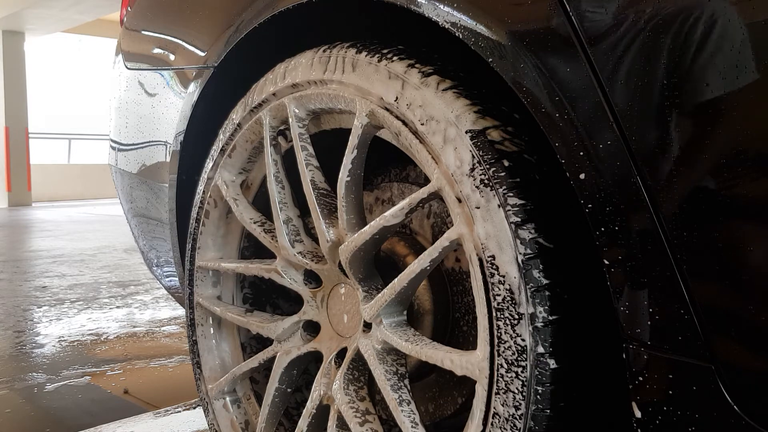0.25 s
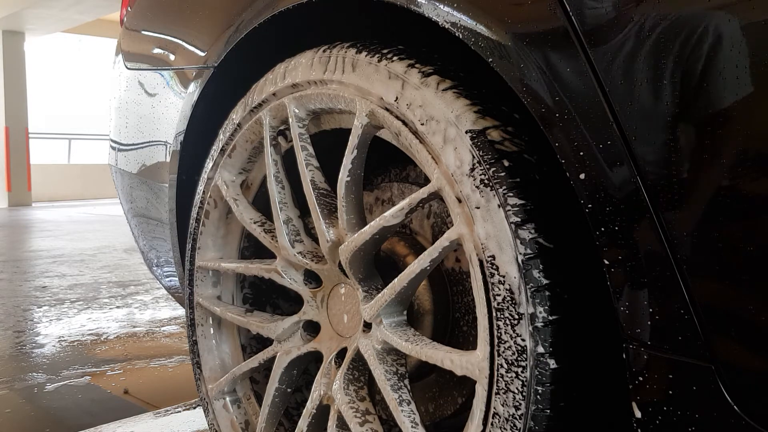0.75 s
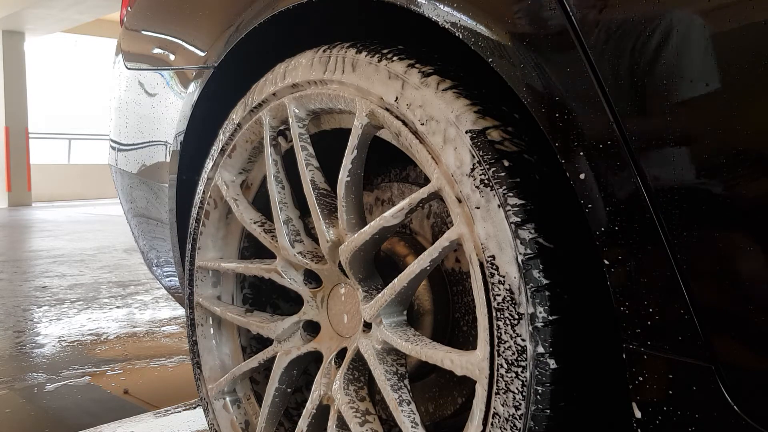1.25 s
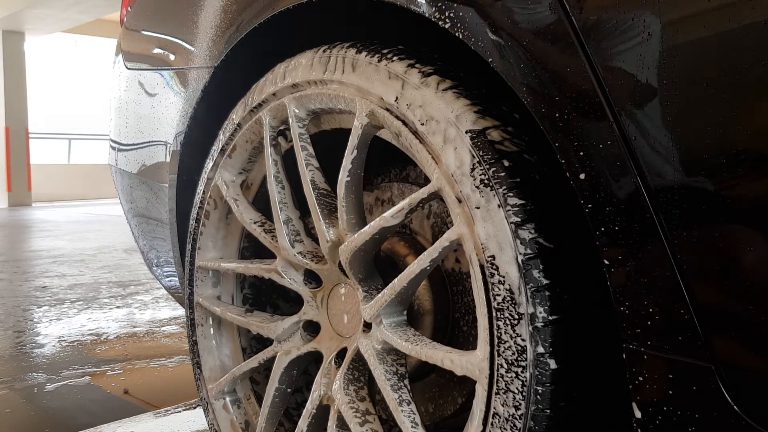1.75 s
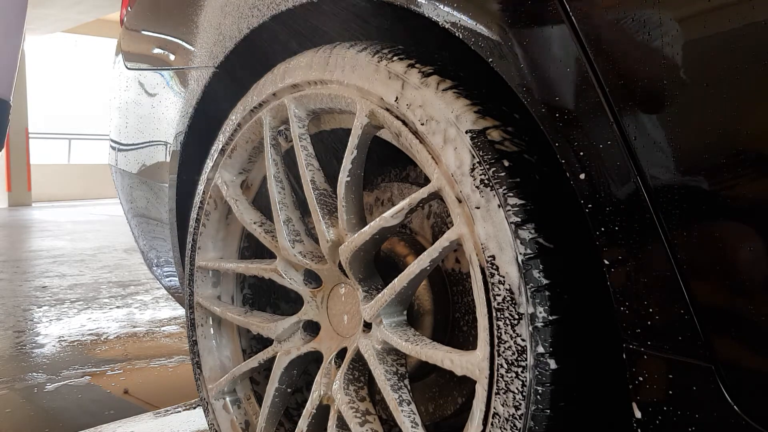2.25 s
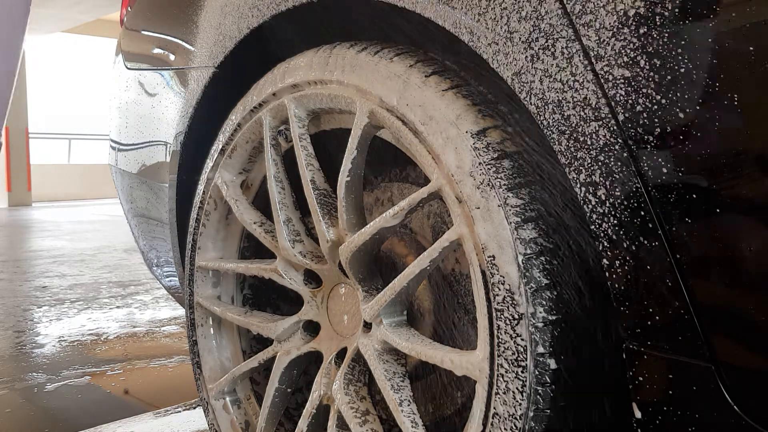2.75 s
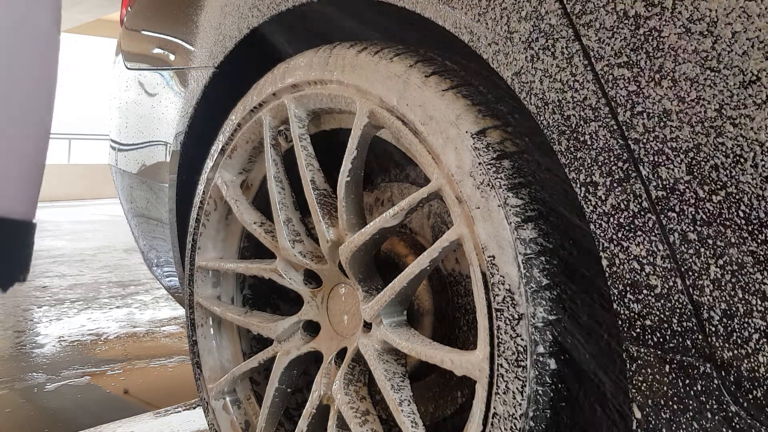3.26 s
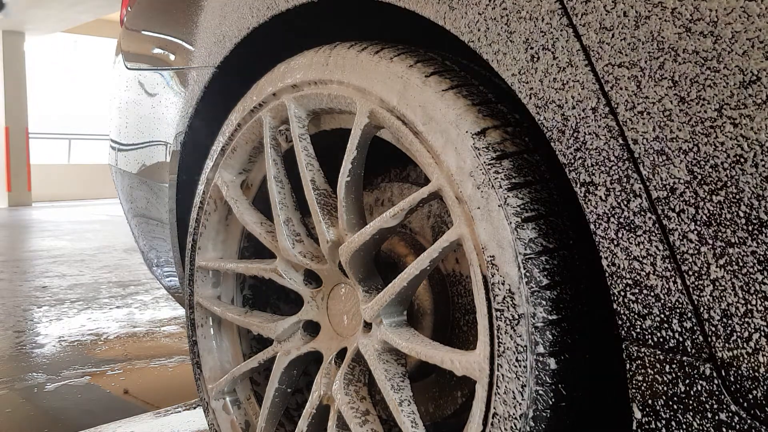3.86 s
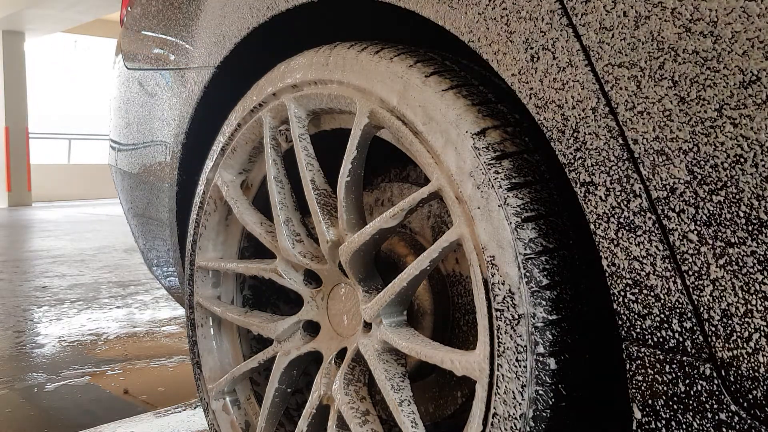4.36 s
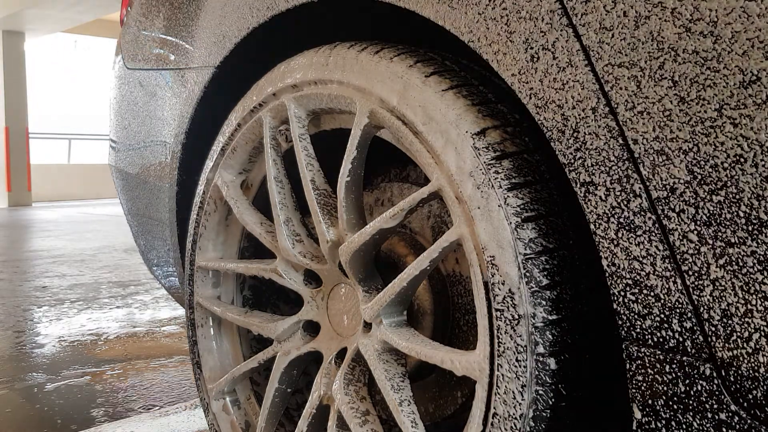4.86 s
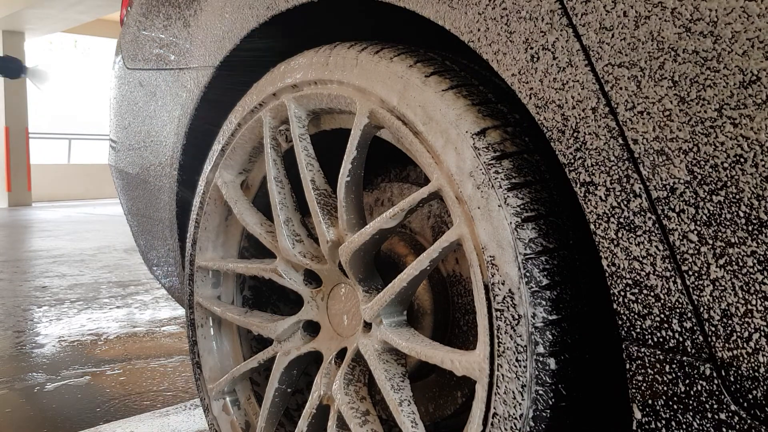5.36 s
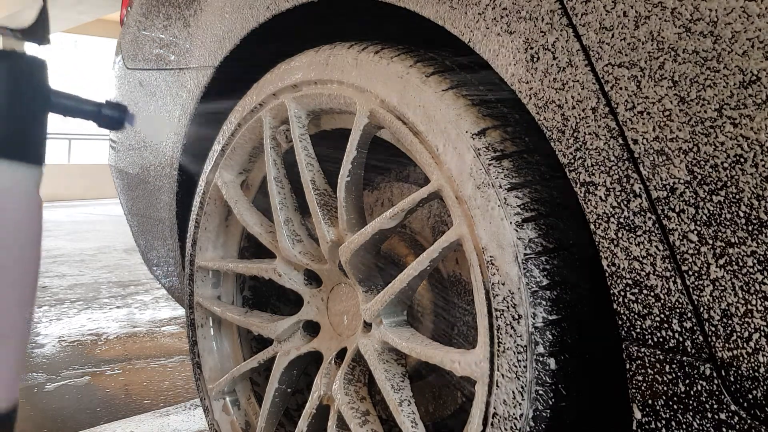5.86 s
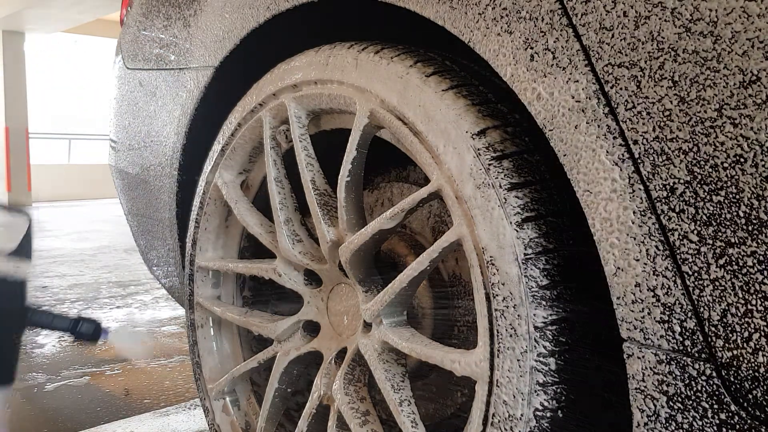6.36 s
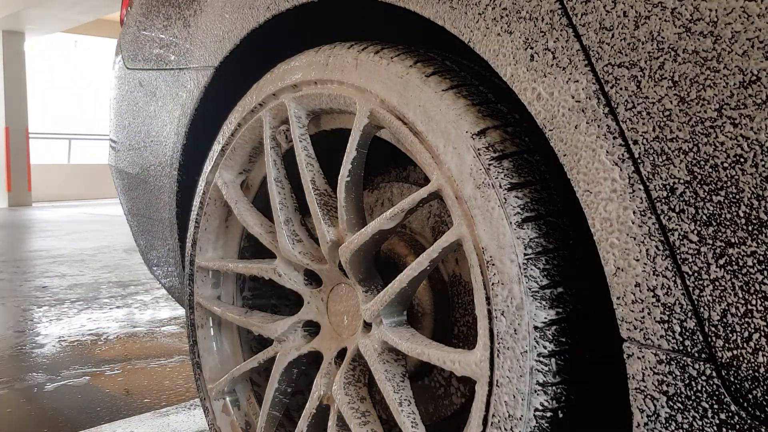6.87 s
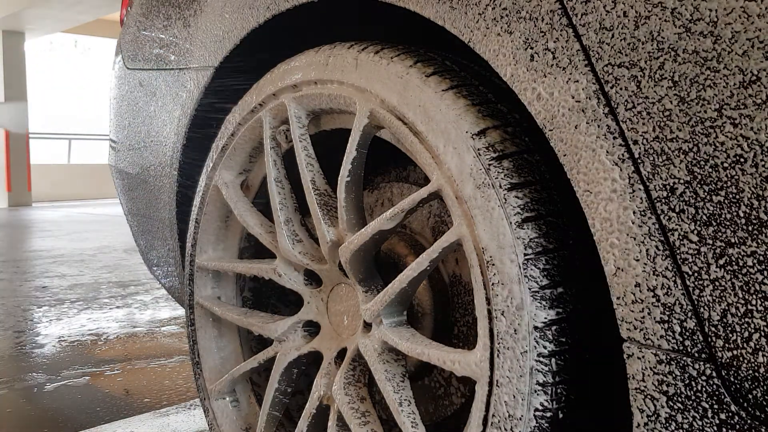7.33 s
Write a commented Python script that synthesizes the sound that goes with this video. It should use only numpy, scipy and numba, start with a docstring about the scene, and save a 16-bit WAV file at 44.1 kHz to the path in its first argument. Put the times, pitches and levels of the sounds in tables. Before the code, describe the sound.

Close stereo pickup beside a car wheel: hard plastic pump knocks, a tiny rising squeak and whistling air leaks come first, with a short diffuse reverberation. Light handling clicks fade into distant engine rumble. Then a pressure sprayer bursts on, its crisp, sputtery hiss strongest early and leaning left, thinning, then swelling again. Fine foam patters underneath, and a small click lands at the very end.

```python
"""Distant engines drone through the concrete decks of an open parking garage while a hand-pump foam sprayer
leaks air; one last pump stroke knocks and squeaks, then the trigger opens and the nozzle hisses and sweeps
beside a car wheel as foam patters on the panel. Turbulent sounds are coloured noise and droplet impulses,
knocks are noise-excited resonances, the squeak is a gliding harmonic series, and the engines are wavering
sines and narrow-band noise."""
import sys
import numpy as np
from scipy import signal
from scipy.fft import rfft, irfft
from scipy.io import wavfile
from scipy.ndimage import uniform_filter1d, map_coordinates
from numba import njit

SR = 44100
rng = np.random.default_rng(int(sys.argv[2]) if len(sys.argv) > 2 else 0)


def put_to_file(sound):
    """Save the sound as 16-bit audio at rate SR, in the file named by the first command-line argument."""
    columns = np.atleast_2d(sound).T  # one column per channel
    safe = np.clip(columns, -1, 1)
    whole_steps = np.round(safe * 32767)
    wavfile.write(sys.argv[1], SR, whole_steps.astype(np.int16))


N = 335160
T = np.arange(N) / SR  # time [s]


def undb(db):
    """Level to amplitude: 20 dB is a factor of ten."""
    return 10 ** (np.asarray(db) / 20)


def unit(x):
    """Normalises to a root-mean-square amplitude of 1."""
    return x / np.sqrt(np.mean(x ** 2))


def curves(table):
    """Linear interpolation of each column of a time table, one value a sample."""
    s, *columns = np.transpose(np.vstack(table))
    return [np.interp(T, s, column) for column in columns]


def at(points, hz):
    """Interpolates a spectral curve along logarithmic frequency."""
    point_hz, value = np.array(points).T
    return np.interp(np.log(hz), np.log(point_hz), value)


@njit
def svf(x, hz, width):
    """State-variable resonance: two coupled integrators form a band-pass of gain 1 at the centre."""
    y, band, low = np.empty(len(x)), 0., 0.
    g, damping = np.tan(np.pi * hz / SR), width / hz
    for i in range(len(x)):
        v = (band + g * (x[i] - low)) / (1 + g * (g + damping))
        band, low, y[i] = 2 * v - band, low + 2 * g * v, damping * v
    return y


def ring(x, modes):
    """Modal superposition of (frequency [Hz], width [Hz], gain [dB]) resonances of alternating sign."""
    total = 0
    for k, (hz, width, db) in enumerate(modes):
        total = total + (-1) ** k * undb(db) * svf(x, 1. * hz, 1. * width)
    return total


def walk(rate):
    """Slow random modulation: levels held 1 / rate seconds and smoothed twice; spread near 1."""
    k = int(SR / rate)
    held = np.repeat(rng.standard_normal(N // k + 1), k)
    return 1.25 * uniform_filter1d(uniform_filter1d(held, k), k)[:N]


def colour(x, points):
    """Linear filtering: weights the spectrum of x by (frequency [Hz], level [dB]) points."""
    return irfft(rfft(x) * undb(at(points, np.fft.rfftfreq(N, 1 / SR) + 1)), N)


def grains(rate, spread_db, share):
    """Shot noise: random droplets of uneven size hold this power share, steady noise the rest."""
    size = undb(spread_db * np.minimum(rng.exponential(size=N), 4.0))
    drops = (rng.random(N) < rate / SR) * size * rng.standard_normal(N)
    share = np.clip(share, 0, 1)
    return np.sqrt(1 - share) * rng.standard_normal(N) + np.sqrt(share) * unit(drops)


def delayed(x, lag_s):
    """Propagation delay: reads x earlier by a fixed or moving lag."""
    return map_coordinates(x, [np.arange(N) - lag_s * SR], order=3)


def ports(make, direct, pan_db, lead_s):
    """Interaural cues: direct sound reaches the left port first, and each port adds scattered sound of its own."""
    near, direct = unit(make()), np.clip(direct, 0, 1)
    straight = np.array([near, delayed(near, lead_s)])
    scattered = np.array([unit(make()), unit(make())])
    pair = np.sqrt(direct) * straight + np.sqrt(1 - direct) * scattered
    return pair * undb(np.array([[1], [-1]]) * pan_db / 2)


def patchy(x, depth_db):
    """Turbulent intermittency: small regions of time and frequency brighten and dull at random."""
    patch_hz, patch_s = 300, .04  # smoothing spans
    hz, s, z = signal.stft(x, SR, nperseg=512)
    field = rng.standard_normal(z.shape[1:])
    for axis, size in enumerate((int(patch_hz / hz[1]), int(patch_s / (s[1] - s[0])))):
        field = uniform_filter1d(uniform_filter1d(field, size, axis=axis), size, axis=axis)
    return signal.istft(z * undb(depth_db * unit(field)), SR, nperseg=512)[1][:, :N]


def leak():
    """Turbulent flow through a gap: puffs past the plunger seal excite whistling and pump-tube resonances."""
    # puffs: (start [s], hold [s], whistle level [dB], rush level [dB], piping level [dB], whistle fade [dB/s])
    puffs = [(0, 0.056, -54, -51, -71, 100), (0.051, 0.068, -66, -40.5, -70, 200),
             (0.15, .075, -67, -54, -59, 300), (0.218, 0.039, -36, -34, -39.5, 700),
             (0.26, 0.061, -51, -42, -53, 88), (0.338, 0.14, -52, -47.5, -58, 37)]
    # high whistle of the gap: (frequency [Hz], width [Hz], relative level [dB])
    whistle_modes = [(9900, 770, -18), (12100, 1900, 0.5), (15200, 900, -0.5)]
    # rush through the pump tube: (frequency [Hz], width [Hz], relative level [dB])
    rush_modes = [(1640, 430, 9), (2380, 580, 5), (3770, 400, 0.5), (4650, 580, -1.5), (5940, 1200, -9.5),
                  (7440, 520, -13)]
    attack_s, sealed_s, sputter_db = 0.0056, 1.05, 2.1
    shapes = []
    for start, hold, *_, fade in puffs:
        attack = np.clip((T - start) / attack_s, 0, 1)
        shapes.append(attack * undb(-fade * np.maximum(T - start - hold, 0)))
    # rush and piping fade 1.5 and 2.5 times as fast as the whistle
    levels = np.array(puffs)[:, 2:5].T
    whistle_gain, rush_gain, piping_gain = (
        undb(db) @ np.power(shapes, speed) for db, speed in zip(levels, (1, 1.5, 2.5)))
    on = np.clip((sealed_s - T) / 0.14, 0, 1) * undb(sputter_db * walk(26.4))
    whistle = ports(lambda: ring(rng.standard_normal(N), whistle_modes), 0.18, -0.48, 0.00019)
    rush = ports(lambda: ring(grains(3000, 2.0, 0.17), rush_modes), 0.45, 0.5, 0.00026)
    # thin note of the valve
    piping = ports(lambda: ring(rng.standard_normal(N), [(5450, 75, 0)]), 0.6, 0.4, 0.000237)
    return on * (whistle * whistle_gain + rush * rush_gain + piping * piping_gain)


def drone(table, waver, swell_db):
    """Multipath fading: a far engine's sine swells and sinks as it bounces between the decks."""
    hz, db = curves(table)
    level = undb(db + swell_db * walk(9) + 2.1 * walk(22))
    phase = 2 * np.pi * np.cumsum(hz * (1 + waver * walk(15))) / SR
    return np.sqrt(2) * level * np.sin(phase)


def garage():
    """Diffuse-field coherence: traffic wash is alike at both ports in the bass, less so above; engines join it."""
    # wash spectrum: (frequency [Hz], relative level per Hz [dB])
    wash_spectrum = [(15, -48), (25, -49), (49, -3), (111, -13.5), (170, -22), (394, -28.5), (451, -26.5),
                     (545, -33), (591, -32), (734, -32.5), (1330, -37.5), (1440, -39.5), (3520, -50.5),
                     (3920, -54), (16000, -73)]
    # left-right correlation: (frequency [Hz], likeness [-1 to 1])
    likeness = [(60, 1), (130, 0.9), (290, 0.87), (640, 0.57), (1200, -0.31), (2500, 0.15), (16000, -0.52)]
    # deep engine drone: (time [s], pitch [Hz], level [dB])
    deep_engine = [(0.0, 62.8, -31), (0.04, 61.9, -27), (0.29, 65.2, -29.5), (0.59, 57.24, -37),
                   (0.76, 62.17, -32), (0.99, 63.8, -38), (1.2, 55.85, -32.5), (2.05, 58.65, -34),
                   (2.26, 67.5, -35.5), (2.58, 65.64, -35), (2.9, 55.7, -43.5), (3.32, 54.3, -29.5),
                   (3.89, 54.57, -40.5), (4.13, 60.1, -41), (4.68, 61.2, -36.5), (4.78, 55.8, -36),
                   (5.08, 62.6, -59), (5.27, 52.95, -44), (6.03, 50.34, -36.5), (6.73, 55.3, -46.5),
                   (7.41, 55.98, -37), (7.6, 59.5, -52)]
    # higher engines blurred into a boom: (time [s], level [dB])
    boom_levels = [(0.0, -56), (0.8, -40.5), (1.35, -33), (1.37, -38.5), (2.33, -40.5), (6.29, -43.5),
                   (6.52, -43), (7.47, -46), (7.49, -37), (7.6, -49)]
    # an engine pulling away: (time [s], pitch [Hz], level [dB])
    pulling_engine = [(6.2, 102.7, -49), (6.41, 99.6, -38), (7.07, 109.5, -40.5), (7.2, 107.3, -45),
                      (7.35, 110.8, -40.5), (7.44, 111.2, -45.5), (7.6, 115, -33)]
    wash_db, pan_db = -43.5, -1.24  # wash level above 150 Hz; left minus right
    alike = np.clip(at(likeness, np.fft.rfftfreq(N, 1 / SR) + 1), -1, 1)
    mid, side = (rfft(colour(rng.standard_normal(N), wash_spectrum)) for _ in range(2))
    pair = irfft(np.sqrt(1 + alike) * mid + np.sqrt(1 - alike) * side * np.array([[1], [-1]]), N)
    upper = signal.sosfilt(signal.butter(4, 150, "high", fs=SR, output="sos"), pair)
    sink_db = np.interp(T, (0.72, 2.1), (0, -3.5))  # the wash thins
    wash = pair / np.sqrt(np.mean(upper ** 2)) * undb(wash_db + sink_db + 0.27 * walk(1.9))
    # boom resonances, each passed twice: (frequency [Hz], width [Hz], gain per pass [dB])
    engines = [(105.7, 28.0, 0.44), (133.2, 21.6, -2.25)]
    blur = sum(ring(ring(rng.standard_normal(N), [engine]), [engine]) for engine in engines)
    boom = undb(curves(boom_levels)[0]) * unit(blur)
    pulling = np.clip((T - pulling_engine[0][0]) / 0.33, 0, 1) * drone(pulling_engine, 0.01, 0.98)
    deep = drone(deep_engine, 0.0404, 0.95)
    return (wash + boom + pulling + deep) * undb([[pan_db / 2], [-pan_db / 2]])


def knocks():
    """Impact excitation: fading rattles ring the plastic pump body and hollow tank, and crack in the treble."""
    # pump knocks and handling scuffs: (time [s], rattle level [dB], 60 dB decay [s], struck near [Hz],
    # hollow share [dB], thump share [dB], treble share [dB])
    blows = [(0.059, -23, 0.059, 2100, -2, -11, -17.5), (0.071, -23.5, 0.032, 2300, -15, -9, -10),
             (0.104, -35, .03, 2200, 2, -14, -17), (0.122, -31, .03, 3000, -10, -14, -13),
             (0.216, -15.5, 0.021, 2620, -18, -17, -26), (0.223, -26.5, 0.028, 4400, -5, 1.5, -18),
             (0.233, -31, 0.021, 2680, -14, -20, -21), (0.244, -42, .025, 2400, -11, -13, -20),
             (0.257, -25, 0.023, 1800, -13, -22, -9), (0.429, -33.5, 0.042, 4370, -10, -19, -10),
             (0.645, -42.5, 0.15, 2500, -17, -14, -13), (0.683, -53.5, 0.039, 4370, 17, 8, -15),
             (0.73, -44, .02, 4400, -5, -10, -8), (0.755, -40, 0.031, 4300, -10, -10, -12),
             (0.779, -50, .02, 4400, -12, -12, -6), (0.879, -42, 0.045, 2900, -11, -15, -20),
             (0.905, -38, .035, 3330, -11, -10, -18), (0.934, -58, 0.03, 2500, 20.5, 10, -15),
             (7.563, -31.5, .04, 1300, -22, -25, -14)]
    # plastic pump body: (frequency [Hz], width [Hz], relative level [dB])
    body_modes = [(1460, 140, -6), (1640, 150, -1), (2010, 170, -3), (2450, 140, -1), (2800, 280, -1),
                  (3480, 260, -4), (4420, 260, -2), (5430, 130, -3)]
    # tank, hollow ring then thump: (frequency [Hz], width [Hz], gain [dB])
    tank_modes = (758, 160, 18.5), (444, 120, 20)
    contact, contact_db = 5.5, -20  # sharp first contact: its size, reached at this level
    body, hollow, thump, crack = parts = np.zeros((4, N))
    t = np.arange(SR // 4) / SR
    chance = rng.standard_normal((len(blows), len(t)))
    chance[:, :3] += contact * np.minimum(undb(np.array(blows)[:, 1:2] - contact_db), 1)
    for (s, db, ring_s, hz, *shares_db), rattle in zip(blows, chance):
        i = int(s * SR)
        blow = (undb(db) * rattle * np.exp(-np.log(1000) * t / ring_s))[:N - i]
        struck = [(hz, 2000, 0)]  # favours the modes near where it lands
        body[i:i + len(blow)] += ring(ring(blow, struck), struck)
        parts[1:, i:i + len(blow)] += undb(shares_db)[:, None] * blow
    dry = undb(7.5) * ring(body, body_modes) + ring(crack, [(6900, 6000, 2.3)])
    for x, mode in zip((hollow, thump), tank_modes):
        dry = dry + ring(ring(x, [mode]), [(mode[0], 4 * mode[1], 0)])
    # car flank and concrete decks answer with a diffuse tail, unlike at the two ports
    t = np.arange(SR // 2) / SR
    decay = np.exp(-np.log(1000) * t / 0.25) * np.clip(t / 0.0018, 0, 1)
    tail = rng.standard_normal((2, len(t))) * decay
    answer = signal.fftconvolve(dry[None], tail, axes=1)[:, :N]
    return dry * undb([[.8], [-.8]]) + undb(-30.5) * answer


def squeak():
    """Stick-slip friction: the seal's harmonic series rises in pitch until the plunger hits its stop."""
    # seal motion: (time [s], pitch [Hz], level [dB])
    glide = [(0.1, 778, -45), (0.113, 875, -46), (0.148, 958, -48), (0.17, 964, -46.5),
             (0.212, 1036, -35.5)]
    # harmonics: (multiple of the pitch, relative level [dB])
    harmonics = [(1, 3), (2, -14), (4, -26), (5, -32), (6, -32), (7, -27), (8, -26)]
    stop_s, fade_s = .221, .005
    hz, db = curves(glide)
    phase = 2 * np.pi * np.cumsum(hz * (1 + 0.0046 * walk(154))) / SR
    on = np.clip((T - glide[0][0]) / .012, 0, 1) * np.clip((stop_s - T) / fade_s, 0, 1)
    series = sum(undb(order_db) * np.sin(k * phase) for k, order_db in harmonics)
    return on * np.sqrt(2) * undb(db + 2.2 * walk(75)) * series


def flank(x, lag_s):
    """Comb filtering: a faint echo off the car flank lags by a time that follows the hand, so the colour swirls."""
    return x + .2 * np.array([delayed(channel, lag_s) for channel in x])


def spray():
    """Jet noise: air jet, tearing liquid and landing foam flutter together because the flow splutters."""
    # nozzle sweep: (time [s], jet level [dB], tearing level [dB], foam landing level [dB],
    # jet left minus right [dB])
    sweep = [(1.62, -25, -39, -52, 0), (1.73, -30, -42.5, -43, -2), (1.9, -29.5, -41, -42.5, -0.5),
             (2.27, -28.5, -39, -45.5, -5.5), (2.5, -28.5, -40.5, -45, -5.5),
             (2.77, -27.5, -42, -44.5, -4.5), (2.9, -26, -40, -43.5, -4.5), (3.08, -25, -40, -44.5, -5.5),
             (3.35, -28, -43, -48, -5), (3.67, -33, -43, -50, -2.5), (4.0, -34, -47, -56, -2),
             (4.2, -33.5, -48.5, -60, -1.5), (4.6, -34.5, -51, -56.5, -1), (5.08, -33, -46.5, -61, -2.5),
             (5.5, -33, -44.5, -58, -2.5), (5.8, -30.5, -43, -52.5, -3), (5.9, -28.5, -42.5, -52.5, -3.5),
             (6.1, -28, -40, -52.5, -4), (6.27, -29, -43, -52, -4), (6.4, -30.5, -42.5, -52, -2),
             (6.7, -30.5, -42.5, -54, -2.5), (7.03, -33, -43, -56, -1.5), (7.3, -32, -41.5, -54.5, -1),
             (7.42, -34.5, -44.5, -58, -1), (7.53, -28.5, -40, -58, -3), (7.6, -31, -41, -51, -1.5)]
    # nozzle place: (time [s], left port lead [ms], flank echo lag [ms])
    place = [(1.6, .2, 2.05), (2.2, .15, 2.0), (3.0, .09, 1.6), (3.8, .18, 1.5), (4.4, .23, 1.4),
             (5.0, .22, 1.45), (5.4, .15, 1.75), (5.9, .1, 2.0), (6.3, .1, 1.6), (6.8, .16, 1.15),
             (7.4, .14, 1.3)]
    # spectrum of the air jet: (frequency [Hz], relative level per Hz [dB])
    jet_spectrum = [(4100, -31), (7000, -9), (9100, -10.5), (10500, -1.5), (12100, 3), (14000, 4),
                    (15700, 7.5), (20000, -5)]
    # spectrum of the tearing liquid: (frequency [Hz], relative level per Hz [dB])
    tear_spectrum = [(1470, -8.5), (2500, -7), (3360, -4), (4530, -0.5), (7790, -5), (9000, 0), (11700, -6),
                     (19800, -120)]
    # spectrum of the landing foam: (frequency [Hz], relative level per Hz [dB])
    foam_spectrum = [(290, -35), (500, -13), (620, -9), (924, -2), (1190, -3.5), (1680, -4), (3200, -9),
                     (4160, -48), (7040, -120)]
    trigger_s, open_s = 1.553, 0.02
    # first spit and easing of pent-up pressure: excess [dB] of jet, tearing and foam
    spit_db, spit_hold_s, spit_fade_s = (6.5, 3.5, 10), 0.016, .004
    burst_db, burst_s = (0, 10.5, -1), 0.069
    jet_db, tear_db, foam_db, pan_db = curves(sweep)
    lead_s, echo_s = np.array(curves(place)) / 1000
    flutter = walk(14)
    # the second argument is the power share heard straight
    jet = ports(lambda: colour(grains(6000, 3.5, 0.43), jet_spectrum), .4, pan_db, lead_s)
    tear = ports(lambda: colour(grains(5000, 2.0, 0.62), tear_spectrum), .35, 0.051 * pan_db, lead_s)
    foam = ports(lambda: colour(grains(3000, 0.75, 0.33), foam_spectrum), .65, -1, lead_s)
    since = np.maximum(T - trigger_s, 0)
    flow = np.clip(since / open_s, 0, 1) ** 2
    spit = np.exp(-np.maximum(since - open_s - spit_hold_s, 0) / spit_fade_s) * (1 + .3 * walk(220))
    ease = np.exp(-np.maximum(since - open_s, 0) / burst_s)
    burst = [a * spit + b * ease for a, b in zip(spit_db, burst_db)]
    jet = jet * undb(jet_db + burst[0] + 0.5 * flutter + 0.94 * walk(40))
    tear = tear * undb(tear_db + burst[1] + 0.16 * flutter + 1.07 * walk(30))
    foam = foam * undb(foam_db + burst[2] + 0.3 * flutter + 0.75 * walk(25.01))
    return flank(flow * (jet + tear + foam), echo_s)


def tones():
    """Frequency-modulated sines: faint narrow whistles come and go under the hiss."""
    # whistles: (start [s], length [s], frequency [Hz], level [dB])
    whistles = [(5.8, .2, 1610, -69), (6.023, .23, 1684, -61.5), (6.72, .17, 1569, -65),
                (7.03, .2, 1570, -63)]
    edge_s = 0.026
    wobble = np.cumsum(0.0027 * walk(25)) / SR
    total = np.zeros(N)
    for start, length, hz, db in whistles:
        edges = np.clip(np.minimum(T - start, start + length - T) / edge_s, 0, 1)
        total += undb(db) * edges * np.sin(2 * np.pi * hz * (T + wobble))
    return np.sqrt(2) * undb(2.5 * walk(18)) * total


def scene():
    """Linear superposition of all the sources."""
    patch_db = 1.3  # spread of the bright and dull patches
    return patchy(leak(), patch_db) + garage() + knocks() + squeak() + patchy(spray(), patch_db) + tones()


def record(dry):
    """Band limiting: the housing dips one band at the left port; deep bass and, steeply, the top are cut."""
    hz, width, depth = 7900, 600, 0.79
    heard = np.array([dry[0] - depth * ring(dry[0], [(hz, width, 0)]), dry[1]])
    low_cut = signal.sosfilt(signal.butter(4, 42, "high", fs=SR, output="sos"), heard)
    return signal.sosfilt(signal.ellip(12, .2, 90, 15780, fs=SR, output="sos"), low_cut)


dry = scene()
out = record(dry)
put_to_file(out)
```